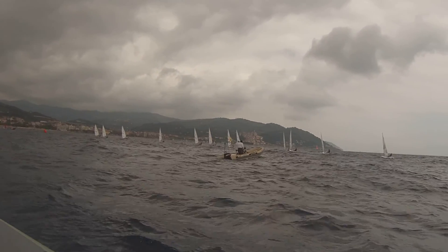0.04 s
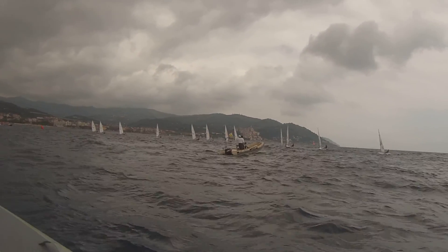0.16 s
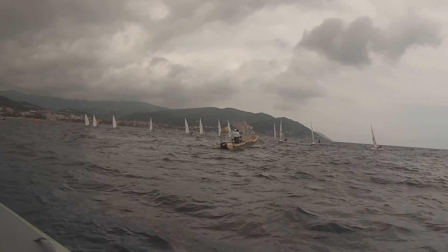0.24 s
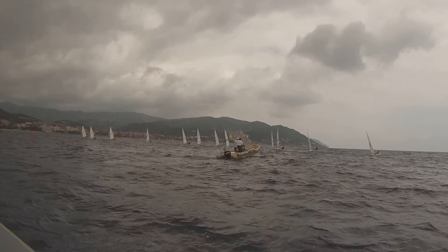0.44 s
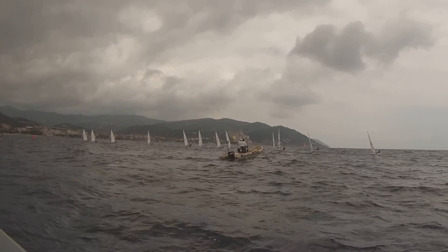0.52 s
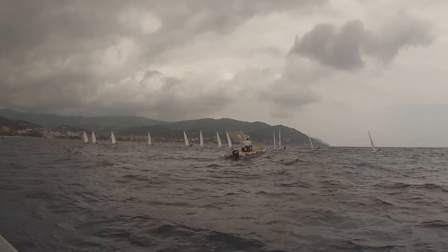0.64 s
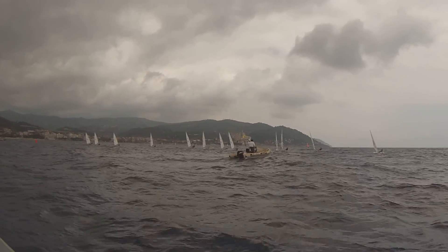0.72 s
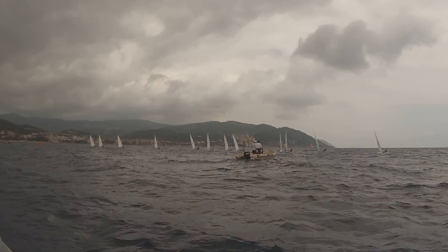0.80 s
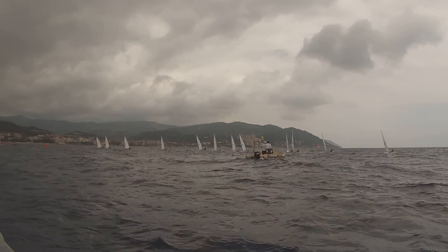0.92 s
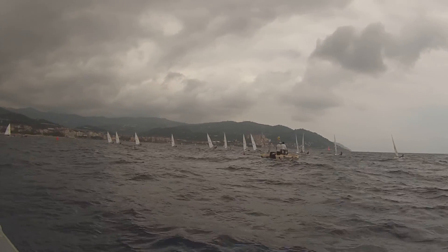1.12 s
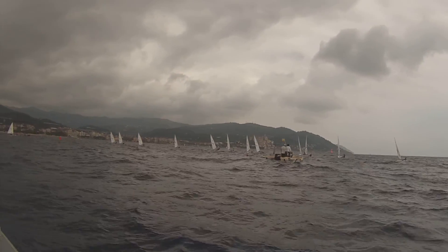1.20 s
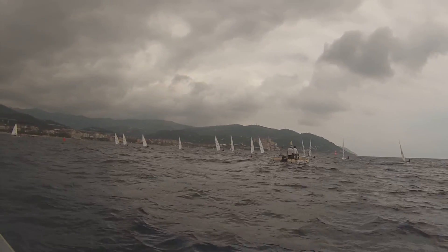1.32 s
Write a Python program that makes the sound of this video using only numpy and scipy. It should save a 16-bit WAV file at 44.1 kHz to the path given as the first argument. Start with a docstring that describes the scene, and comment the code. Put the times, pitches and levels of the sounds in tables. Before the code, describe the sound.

Water washes softly along a small boat's hull throughout, over low wind rumble and a faint ring from the camera's plastic housing. At about 0.2 seconds a gust thuds on the microphone with a hiss of spray, the loudest moment. One hard, hollow knock follows at 0.3 seconds. Soft wind puffs continue until 0.9, small splashes spit around 0.7, and faint foam crackles past near 1.1 seconds.

```python
"""A small boat on open water, heard from a camera in a plastic housing.
A gust thuds against the microphone with a hiss of spray, something hard knocks once on the boat,
and a few soft puffs follow. Water washes along the hull, spitting small splashes, and a patch of
foam crackles past. Underneath, wind rumbles low and the housing rings faintly with wind and water."""
import sys
import numpy as np
from scipy import signal
from scipy.fft import rfft, irfft, next_fast_len
from scipy.io import wavfile
from scipy.ndimage import map_coordinates

SR = 44100
rng = np.random.default_rng(int(sys.argv[2]) if len(sys.argv) > 2 else 0)


def dump_mix(stems):
    """Bounce the given channels to the path in sys.argv[1] as a 16-bit WAV at rate SR."""
    frames = np.atleast_2d(stems).T  # one column per channel
    limited = np.clip(frames, -1, 1)  # hard clip at full scale
    pcm = np.round(limited * 32767).astype(np.int16)
    wavfile.write(sys.argv[1], SR, pcm)


N = 59535

# Air on the microphone; the loudest puff is the thud.
# Each row: peak time in seconds, suction in dB, rise and fall in seconds.
PUFFS = [(0.1331, -37, .002, .0015), (0.1621, -32, 0.00087, 0.00044), (0.2307, -10, .0036, 0.0043),
         (.243, -32, 0.0027, 0.0017), (0.26, -26.5, 0.0024, 0.0057), (.426, -39, 0.00083, .0012),
         (0.4836, -33, 0.00096, 0.00087), (0.5124, -34.5, 0.002, 0.00047), (0.5555, -33.5, 0.0012, 0.0013),
         (0.6026, -38.5, 0.0014, 0.001), (0.824, -36, 0.0025, 0.0045), (0.913, -46, 0.0023, 0.0025),
         (0.945, -38.5, 0.0037, 0.0024)]
PUFF_SOFT_HZ, MIC_BASS_HZ, MIC_DAMPING = 594, 23, 1
# Bursts of spray. Each row: peak time in seconds, level in dB, rise and fall in seconds.
SPRAY_BURSTS = [(0.158, -46, 0.0081, .012), (0.2284, -33.5, 0.0038, 0.0075), (0.233, -45, 0.021, 0.025)]
# The spray's colour. Each row: frequency in Hz, relative level in dB.
SPRAY_COLOUR = [(150, 14), (400, -15), (600, -10), (790, 3.5), (1050, -5.5), (1500, -4), (2400, 2.5),
                (3300, -5.5), (5200, -9.5), (6600, -18), (7900, -13), (8800, -25.5), (11200, -21.5),
                (15000, -33)]

# The knock's hollow body. Each row: pitch in Hz, relative level in dB, seconds to fade by 60 dB.
BODY_MODES = [(656, -26.5, 0.08), (893, -18, 0.031), (1038, -8, 0.013), (1412, 1, 0.011),
              (1600, -30, 0.0049), (1920, -20.5, 0.02), (2050, -13, 0.0083), (2410, -17.5, 0.018)]
# Its faint, bright tick. Each row: pitch in Hz, relative level in dB, seconds to fade by 60 dB.
TICK_MODES = [(3350, -25, .009), (4750, -25.5, 0.0076), (6150, -29, 0.014)]
KNOCK_S, KNOCK_GAIN_DB, KNOCK_ATTACK_S, KNOCK_SOFT_HZ = .30635, -16, .0001, 2450
PUSH_HZ, PUSH_DB, PUSH_T60_S, PUSH_RISE_S, PUSH_LAG_S = 69, -13.5, 0.036, 0.0041, 0.0003

# Waves along the hull. Each row: time in seconds, gain on fizz and droplets in dB.
WASH_SWELL = [(0, -67), (.08, -67), (.15, -64), (.28, -60), (.35, -68), (.42, -64), (.49, -66), (.6, -64),
              (.7, -65.5), (.78, -66), (.9, -64), (1.03, -63.5), (1.15, -64.5), (1.27, -65.5), (1.35, -66)]
# The water's fizz. Each row: frequency in Hz, relative level in dB.
FIZZ_COLOUR = [(100, 1.5), (300, 1), (600, 4), (1000, 1.5), (1450, -3.5), (1800, -10), (2900, -3),
               (3700, -1), (5200, -6.5), (7500, -13), (9000, -16), (12000, -18.5), (15000, -29)]
# The droplets' sparkle. Each row: frequency in Hz, relative level in dB.
DROP_COLOUR = [(1000, -25), (3000, 1), (4500, 0), (7500, -6.5), (10000, -15), (15000, -17)]
FIZZ_GAIN_DB, FIZZ_FLUTTER_DB = 3, 1
DROPS_PER_S, DROP_GAIN_DB, POP_SPREAD_DB = 610, -5, 4
# Small splashes. Each row: peak time in seconds, level in dB, rise and fall alike in seconds.
SPLASHES = [(0.068, -58.5, 0.0024), (0.127, -60, 0.011), (0.433, -67, 0.0069), (0.563, -62, 0.0027),
            (0.65, -51.5, 0.0038), (0.684, -56, 0.0045), (0.711, -57.5, 0.02), (0.743, -52.5, 0.0027),
            (.822, -59, .002), (.843, -60, .002), (1.147, -63, 0.018), (1.176, -60, .004),
            (1.338, -59, 0.0033)]
# Their bright spit. Each row: frequency in Hz, relative level in dB.
SPLASH_COLOUR = [(1000, -0.5), (2800, 1), (4000, 3), (5200, 3), (7500, -5.5), (9000, -13.5), (12000, -12.5),
                 (15000, -31)]
# The foam's airy crackle. Each row: frequency in Hz, relative level in dB.
FOAM_COLOUR = [(2000, -13), (5000, 3), (8000, 8), (10500, -1), (12500, -11), (15000, -16)]
FOAM_PEAK_S, FOAM_DB, FOAM_RISE_S, FOAM_FALL_S, FOAM_POPS_PER_S = 1.07, -67.5, 0.19, 0.16, 2900

# Air resonances in the housing. Each row: centre in Hz, half-width in Hz, relative level in dB.
HOUSING_MODES = [(1470, 296, -10.5), (2235, 142, -1)]
# How loudly the housing rings. Each row: time in seconds, level in dB.
RING_LEVEL = [(0, -57.5), (.06, -63.5), (.16, -51.5), (.28, -55), (.34, -59.5), (.42, -56), (.51, -58.5),
              (.6, -53), (.68, -58), (.78, -57.5), (.94, -56), (1.06, -54.5), (1.2, -56.5), (1.35, -57.5)]
RING_FLUTTER_DB = 1.3
# The wind's rumble. Each row: frequency in Hz, relative level in dB.
WIND_COLOUR = [(10, -6), (28, 4.5), (50, -3.5), (95, -4), (160, -12), (300, -18.5), (600, -29), (2000, -61)]
# The gust building and easing. Each row: time in seconds, level in dB.
WIND_LEVEL = [(0, -57), (.1, -52), (.19, -45.5), (.3, -47), (.4, -49.5), (.47, -52.5), (.6, -51.5),
              (.76, -53.5), (.83, -50.5), (.93, -52.5), (1.06, -52), (1.35, -53)]
TOP_HZ = 15200


def puffs():
    """Each rounded puff sucks at the microphone, which swings back through its bass roll-off."""
    suction = sum(-amp(db) * cusp(s, rise, fall) for s, db, rise, fall in PUFFS)
    rounded = lowpass(suction, PUFF_SOFT_HZ, order=2)
    bass_rolloff = lambda f: -f * f / (MIC_BASS_HZ ** 2 - f * f + 1j * MIC_DAMPING * MIC_BASS_HZ * f)
    return filtered(rounded, bass_rolloff)


def spray():
    """Spray hisses up with the gust and peaks on the thud."""
    level = sum(amp(db) * cusp(s, rise, fall) for s, db, rise, fall in SPRAY_BURSTS)
    return level * coloured(rng.standard_normal(N), SPRAY_COLOUR)


def knock():
    """One hard contact on the boat: a hollow body and a faint tick over a dull, low push."""
    age = np.maximum(clock() - KNOCK_S - PUSH_LAG_S, 0)
    envelope = amp(PUSH_DB - 60 * age / PUSH_T60_S) * (1 - np.exp(-age / PUSH_RISE_S))
    push = envelope * np.sin(2 * np.pi * PUSH_HZ * age)
    body = lowpass(ringing(BODY_MODES), KNOCK_SOFT_HZ, order=8)
    return push - amp(KNOCK_GAIN_DB) * (body + ringing(TICK_MODES))


def ringing(modes):
    """Damped modes set going by the knock."""
    age = np.maximum(clock() - KNOCK_S, 0)
    tones = sum(amp(db - 60 * age / t60) * np.sin(2 * np.pi * hz * age) for hz, db, t60 in modes)
    return tones * (1 - np.exp(-age / KNOCK_ATTACK_S))


def wash():
    """Water fizzes along the hull with tiny droplets, swelling with each wave."""
    fizz = coloured(rng.standard_normal(N), FIZZ_COLOUR)
    fizz *= amp(FIZZ_GAIN_DB + FIZZ_FLUTTER_DB * wobble(per_s=70.9))
    droplets = amp(DROP_GAIN_DB) * coloured(pops(DROPS_PER_S), DROP_COLOUR)
    return amp(curve(WASH_SWELL)) * (fizz + droplets)


def splashes():
    """Little crests break beside the hull in short, bright spits."""
    level = sum(amp(db) * cusp(s, length, length) for s, db, length in SPLASHES)
    return level * coloured(rng.standard_normal(N), SPLASH_COLOUR)


def foam():
    """A patch of foam crackles past after a wave, dense with tiny pops."""
    level = amp(FOAM_DB) * cusp(FOAM_PEAK_S, FOAM_RISE_S, FOAM_FALL_S)
    return level * coloured(pops(FOAM_POPS_PER_S), FOAM_COLOUR)


def housing():
    """Wind and water stir the housing's narrow resonances in uneven spurts."""
    resonances = lambda f: sum(amp(db) / (1 + ((f - hz) / width) ** 2) for hz, width, db in HOUSING_MODES)
    stirring = rng.standard_normal(N) * amp(RING_FLUTTER_DB * wobble(per_s=89.7))
    return amp(curve(RING_LEVEL)) * unit(filtered(stirring, resonances))


def wind(lumps_db=2):
    """Wind on the microphone lays down a low, lumpy bed of rumble."""
    rumble = coloured(rng.standard_normal(N), WIND_COLOUR)
    lumps = amp(lumps_db * wobble(per_s=25))
    return amp(curve(WIND_LEVEL)) * unit(rumble * lumps)


def amp(db):
    return 10 ** (np.asarray(db) / 20)


def unit(x):
    return x / np.sqrt(np.mean(x ** 2) + 1e-20)


def clock():
    return np.arange(N) / SR


def curve(rows):
    """A fader ride: straight lines between points of time and value."""
    return np.interp(clock(), *np.transpose(rows))


def cusp(peak_s, rise, fall):
    """Exponential swell to a sharp peak, then exponential fall."""
    t = clock() - peak_s
    return np.exp(-np.abs(t) / np.where(t < 0, rise, fall))


def wobble(per_s):
    """A smooth drift through per_s random values a second."""
    return map_coordinates(rng.standard_normal(400), [clock() * per_s], mode="wrap")


def pops(per_s):
    """Tiny clicks at random moments, of random size and sign."""
    clicks = (rng.random(N) < per_s / SR) * rng.choice([-1, 1], N)
    return clicks * amp(POP_SPREAD_DB * np.clip(rng.standard_normal(N), -2, 2))


def filtered(x, response):
    """x shaped by a complex frequency response."""
    size = next_fast_len(N + SR // 2)
    return irfft(rfft(x, size) * response(np.fft.rfftfreq(size, 1 / SR)), size)[:N]


def coloured(x, colour):
    """x equalised by a colour table, at rms 1."""
    hz, db = np.transpose(colour)
    eq = lambda f: amp(np.interp(np.log(f + 1), np.log(hz + 1), db))
    return unit(filtered(x, eq))


def lowpass(x, hz, order):
    return signal.lfilter(*signal.butter(order, hz, fs=SR), x)


def scene():
    """All layers meet at the one microphone."""
    return (puffs() + spray() + knock() + wash() + splashes() + foam() + housing() + wind())[None]


def record(dry):
    """The camera keeps nothing above its band limit."""
    return filtered(dry[0], lambda hz: hz < TOP_HZ)[None]


dry = scene()
out = record(dry)
dump_mix(out)
```